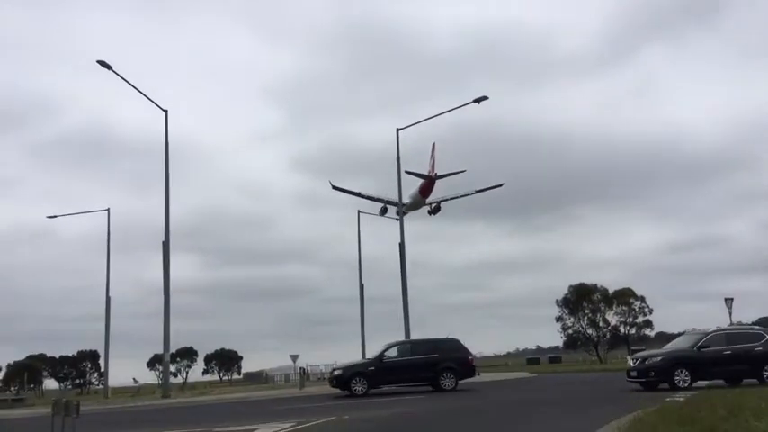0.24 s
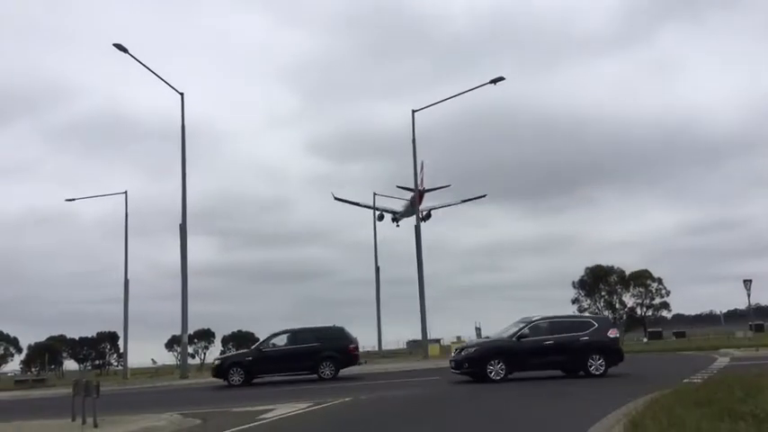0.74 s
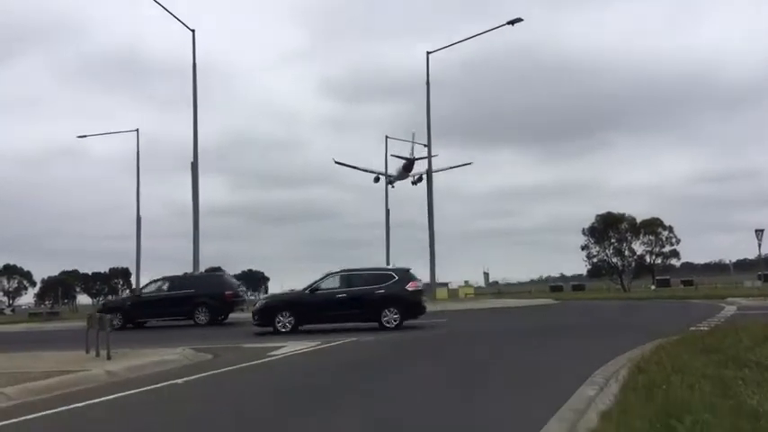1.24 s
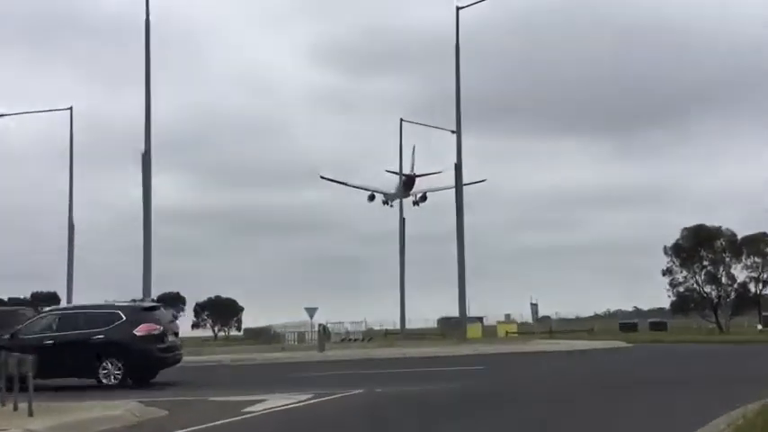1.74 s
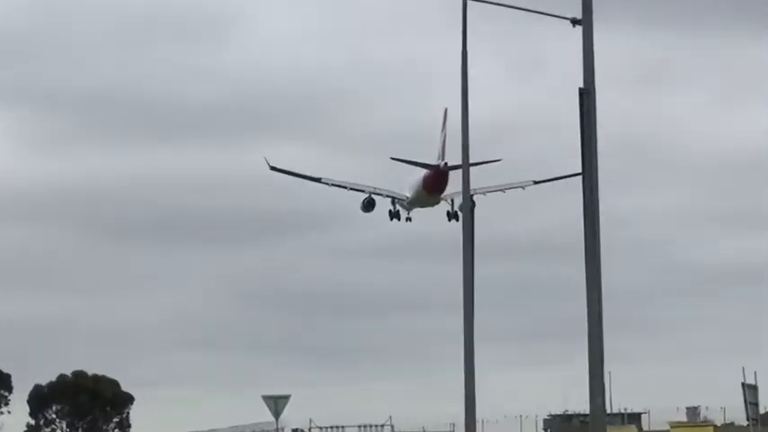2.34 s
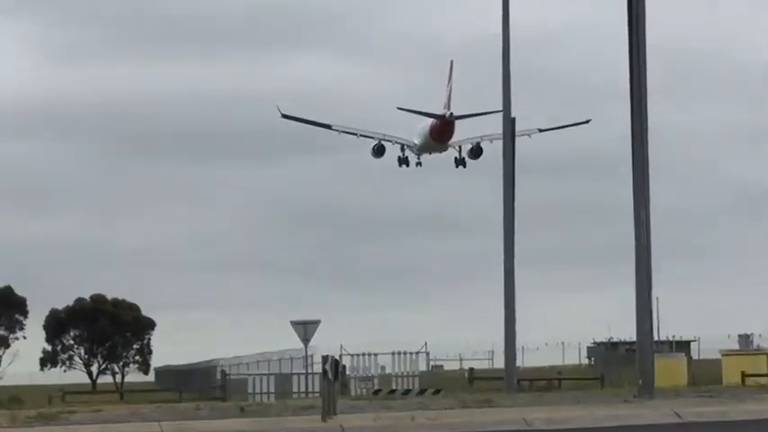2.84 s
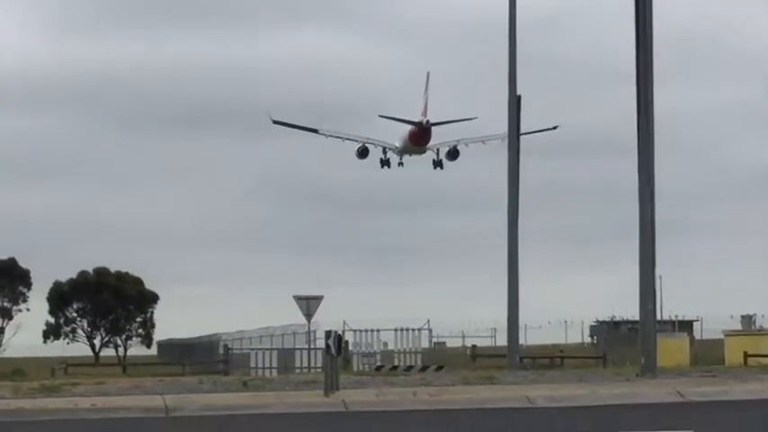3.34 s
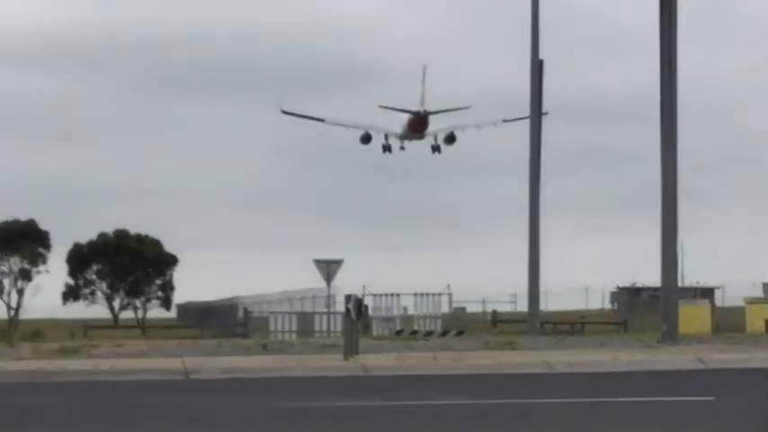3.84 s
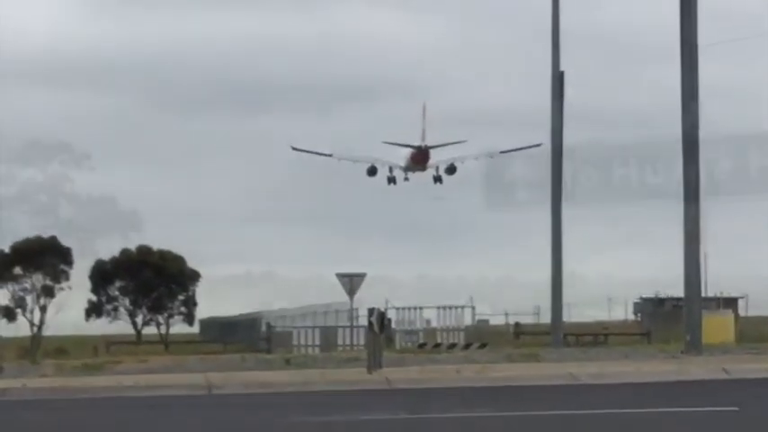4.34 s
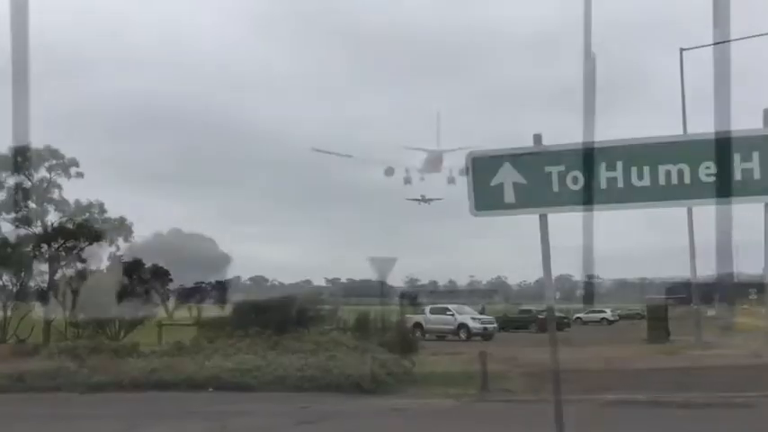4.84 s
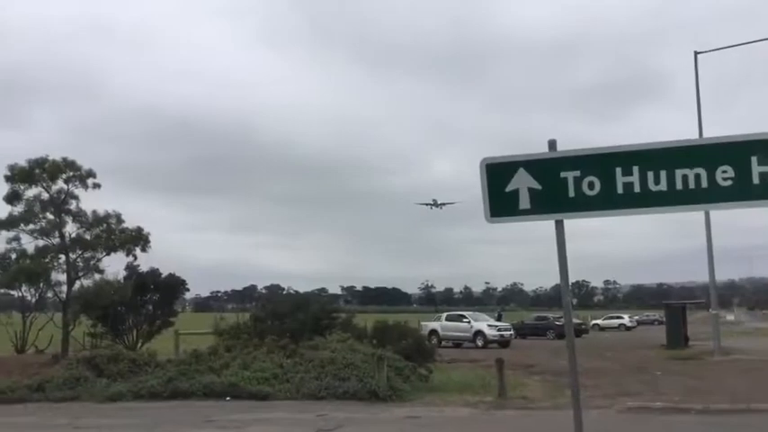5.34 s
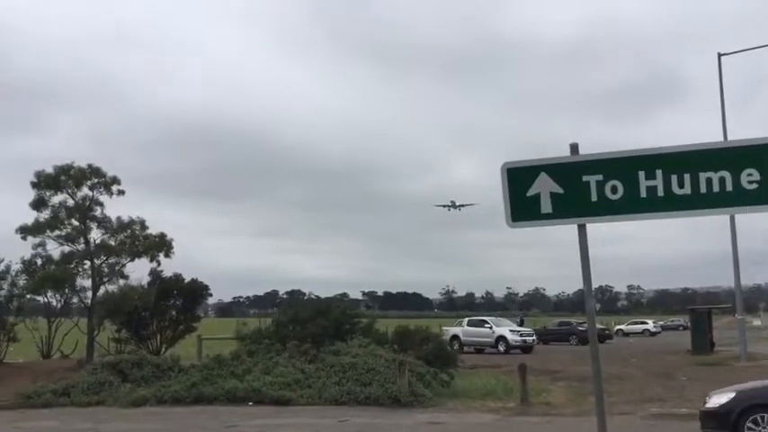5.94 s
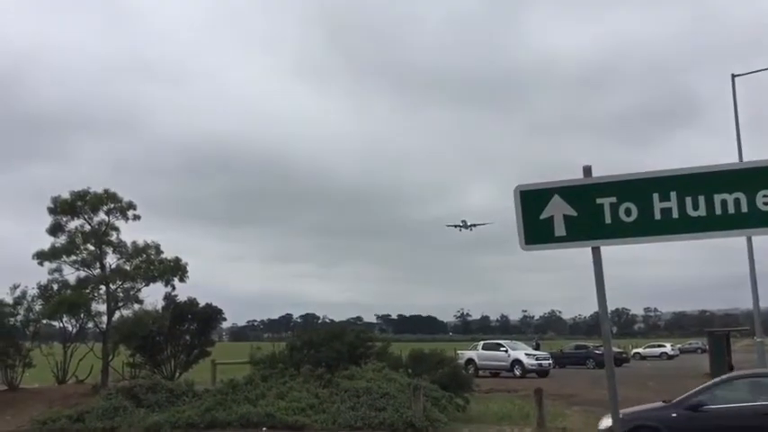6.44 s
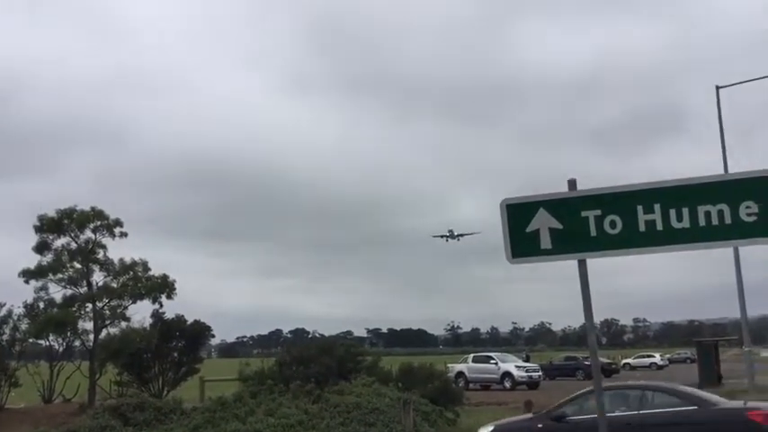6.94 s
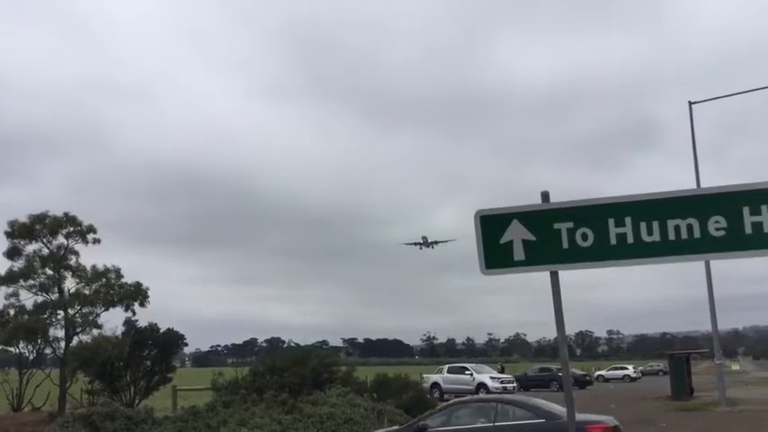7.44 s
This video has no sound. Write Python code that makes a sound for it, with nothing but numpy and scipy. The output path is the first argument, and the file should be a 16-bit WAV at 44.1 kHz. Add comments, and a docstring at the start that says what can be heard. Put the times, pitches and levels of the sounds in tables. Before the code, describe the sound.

Receding landing jet with heavy buffeting rumble, roar and fading hiss dissolves into passing cars: low engine boom, swishing tyres, snapping grit, faint distant aircraft.

```python
"""Under a landing path: a twin-engined airliner, just past low overhead, draws away towards the runway.
Its exhaust noise rumbles, roars against the road's echo and loses hiss to the air; its fans whine and drone.
Then a crossfade to a roadside: a car's firing note booms as it pulls away and thin far whistles waver.
Tyres swish, faint fan notes of a distant airliner drift in, grit snaps and the traffic draws nearest.
A faint hiss of open field lies under both places."""
import sys
import numpy as np
from scipy import signal
from scipy.fft import rfft, irfft, next_fast_len
from scipy.io import wavfile
from scipy.ndimage import uniform_filter1d, map_coordinates

SR = 44100
rng = np.random.default_rng(int(sys.argv[2]) if len(sys.argv) > 2 else 0)


def master(y):
    """Save y as 16-bit WAV."""
    cut = np.clip(np.atleast_2d(y).T, -1, 1)
    pcm = np.round(cut * 32767)  # scale
    wavfile.write(sys.argv[1], SR, pcm.astype(np.int16))


N = 339570

# Spectra give only a shape, since the noise is brought to rms 1. half_s is the time from peak to 1/e.
# Open field, spectrum of its hiss: pitch_hz [Hz], density_db [dB per Hz]
FIELD_SPECTRUM = [(20, -20.5), (3000, 0.5), (8800, 0), (10000, -5.5), (12000, -8), (13300, -14)]
FIELD_DB = -70.5

# Thin far whistles: peak_s [s], level_db [dB], half_s [s], pitch_hz [Hz]
FAR_WHISTLES = [(4.82, -70.5, .1, 5600), (5.04, -65, .05, 5500), (5.22, -71, .13, 5650),
                (5.36, -65, .08, 4580), (5.4, -66, .07, 4980), (5.56, -60, .07, 4950),
                (6.75, -69, .5, 4700), (6.92, -65, .025, 4980)]
# Fan notes of the distant airliner: peak_s [s], level_db [dB], half_s [s], pitch_hz [Hz]
FAR_FAN_NOTES = [(6.004, -44.5, 0.39, 1274), (6.15, -36.5, .45, 999)]

# Low rumble of the road, spectrum: pitch_hz [Hz], density_db [dB per Hz]
TRAFFIC_SPECTRUM = [(16, -48.5), (28, -21.5), (43, -7), (64, 3.5), (123, -2.5), (151, -0.5), (182, -2.5),
                    (221, -2.5), (296, -3.5), (370, -7.5), (430, -11), (520, -15), (680, -31.5),
                    (1140, -120)]
# Tyre noise, spectrum: pitch_hz [Hz], density_db [dB per Hz]
TYRE_SPECTRUM = [(240, -40), (440, -10.5), (620, -2.5), (740, -1), (822, -2), (998, -0.5), (1340, -7.5),
                 (1700, -18), (2210, -49.5), (3740, -120)]
# Brighter tread noise, spectrum: pitch_hz [Hz], density_db [dB per Hz]
TREAD_SPECTRUM = [(790, -29), (1350, -4.5), (1550, 0.5), (1750, 0), (2950, -15), (4250, -25.5), (5040, -47),
                  (5500, -39.5), (7150, -56.5), (12100, -120)]
# Treble fizz of the road, spectrum: pitch_hz [Hz], density_db [dB per Hz]
FIZZ_SPECTRUM = [(2710, -22), (4600, -8.5), (5050, -10), (5230, -11.5), (7180, -20.5), (9330, -31),
                 (15800, -120)]
# Swells of that fizz: peak_s [s], level_db [dB], half_s [s]
FIZZ_RISES = [(5.22, -63.5, 0.57), (7.7, -67.5, .7)]
FIZZ_DB = -65  # its steady part
TRAFFIC_NEAREST_S, TRAFFIC_PASS_S = 7.29, 1.54  # moment of closest distance; time to drive that distance
# Traffic: closest_db [dB], fall_db [dB per tenfold distance]
LOW_LAW, TYRE_LAW, TREAD_LAW = (-23, 11.784), (-27, 14), (-35.5, 14.6)

# Grit snapping under tyres: peak_s [s], tick_db [dB, peak], pitch_hz [Hz], crack_db [dB]
GRIT_SNAPS = [(5.762, -52, 8000, -72), (6.300, -30, 3700, -68), (7.294, -44, 6900, -60),
              (7.2953, -51, 7000, -68), (7.429, -55, 8500, -61)]
GRIT_HALF_S, CRACK_HZ, CRACK_OCTAVES = .0003, 11300, .2  # length of a snap; centre and spread of its crack

# Swish of the nearest tyres, level curve: time_s [s], level_db [dB]
SWISH_LEVEL = [(5.1, -66), (5.35, -42.5), (5.55, -54), (5.8, -71), (6.0, -59), (6.15, -43.5), (6.45, -44.5),
               (6.62, -38.5), (6.83, -40.5), (6.92, -45), (7.3, -53), (7.62, -48)]
# Swish, spectrum: pitch_hz [Hz], density_db [dB per Hz]
SWISH_SHAPE = [(300, -78), (1200, -14.5), (2100, 6), (3000, -5.5), (3800, -14), (4600, -29), (10000, -120)]

# A car's exhaust as it pulls away: mean firing note [Hz], mean level [dB], then the load's course [s]
BOOM_HZ, BOOM_DB = 58.5, -28
BOOM_START_S, BOOM_ATTACK_S, BOOM_HOLD_S, BOOM_RELEASE_S = 4.94, 0.09, 0.52, .27

# The jet's path: moment overhead; time to fly its own height
OVERHEAD_S, HEIGHT_S = -1.0, 0.95
ECHO_MS = 3.806  # lag of the road's echo with the jet overhead
# Treble lost per height of distance; distance (in heights) at which the hiss keeps its spectrum
AIR_DB_PER_KHZ, AIR_NEUTRAL = 1, 2.126
DRONE_HZ, MACH = 372, .135  # drone before its Doppler drop; speed as a fraction of the speed of sound

# Blade whine, mean pitch as heard: time_s [s], pitch_hz [Hz]
WHINE_COURSE = [(.6, 4100), (1.3, 4200), (2.8, 4220), (3.1, 4450), (3.7, 4420), (4.1, 4140), (4.6, 4250)]
# Moments when the whine comes through more clearly: peak_s [s], level_db [dB], half_s [s]
WHINE_RISES = [(2.78, -61, 0.1), (3.5, -64, .35), (4.02, -59, 0.13)]
# Strongest exhaust puffs: peak_s [s], level_db [dB], half_s [s], centre_hz [Hz]
EXHAUST_PUFFS = [(.07, -13.5, 0.031, 297), (.1, -12.5, 0.0575, 90), (.215, -14, 0.056, 310),
                 (.35, -14.5, 0.0635, 85.2), (.558, -10.5, 0.0226, 73), (.64, -17.5, 0.043, 110),
                 (.865, -16.5, 0.028, 151.3), (1.33, -17, 0.042, 141.5), (1.62, -15, 0.02, 90),
                 (1.744, -9, 0.01081, 130.7), (1.79, -12, .016, 80), (2.414, -16.5, 0.029, 109.7),
                 (2.888, -14, .014, 139), (3.11, -15, 0.063, 82), (3.296, -18, .05, 72),
                 (3.48, -9, 0.0072, 130.9), (4.67, -20, 0.0475, 80)]
# Brief swells of noise in the jet's roar and hiss: peak_s [s], level_db [dB], half_s [s], centre_hz [Hz]
ROAR_HISS_SWELLS = [(.49, -48, 0.056, 4810), (.52, -61.5, .08, 6980), (.89, -62, .05, 6500),
                    (.84, -29, 0.15, 1620), (.92, -42, 0.12, 3800), (1.07, -27.5, 0.034, 1195),
                    (1.1, -47.5, 0.11, 4785), (1.4, -57, 0.045, 5300), (1.66, -48.5, 0.055, 3770),
                    (1.95, -29, 0.19, 720), (2.5, -31.5, 0.27, 723), (4.15, -40, 0.18, 1684),
                    (4.2, -28.5, .25, 320)]
PUFF_OCTAVES, SWELL_OCTAVES = 0.43, 0.328  # spread round each centre

# Exhaust rumble at first, spectrum: pitch_hz [Hz], density_db [dB per Hz]
RUMBLE_FIRST = [(18, -45), (30, -22.5), (49, -3.5), (108, 1.5), (167, -2), (199, -1), (240, -4.5),
                (331, -6), (403, -6), (443, -14.5), (480, -18), (620, -42), (1060, -120)]
# Exhaust rumble farther off, spectrum: pitch_hz [Hz], density_db [dB per Hz]
RUMBLE_LATER = [(18, -49), (30, -25), (57, -1.5), (98, 0.5), (260, -3.5), (298, -7), (335, -11),
                (399, -17.5), (480, -21), (620, -47), (1060, -120)]
# Jet roar at first, spectrum: pitch_hz [Hz], density_db [dB per Hz]
ROAR_FIRST = [(210, -26.5), (360, 0), (420, -5.5), (602, 0.5), (902, -6), (1010, -6), (1630, -11),
              (1790, -16), (2110, -13), (2460, -23), (2800, -19), (3640, -49), (6160, -120)]
# Jet roar farther off, spectrum: pitch_hz [Hz], density_db [dB per Hz]
ROAR_LATER = [(210, -29.5), (360, -2.5), (474, -6.5), (563, -1.5), (680, -3.5), (941, -7.5), (1110, -8),
              (1480, -12), (1760, -16), (2110, -18), (2800, -28), (3640, -51.5), (6160, -120)]
# Jet hiss before the air's treble loss, spectrum: pitch_hz [Hz], density_db [dB per Hz]
HISS_SPECTRUM = [(1290, -22.5), (2200, -5), (2500, -4.5), (2710, -6.5), (3350, -5.5), (4170, -9),
                 (4760, -14.5), (5950, -22), (7180, -35), (8600, -41.5), (9800, -53), (15800, -120)]
# High hiss of the jet, round 6 kHz, spectrum: pitch_hz [Hz], density_db [dB per Hz]
HIGH_HISS_SPECTRUM = [(4200, -29.5), (5400, -1.5), (6300, 0), (6900, -3), (7600, -15), (11000, -50)]

# What the jet radiates, one row a layer: overhead_db [dB, without lobe], fall_db [dB per tenfold distance],
# lobe_db [dB], lobe_s [s], lobe_half_s [s]
RUMBLE_RADIATION = (-14.5, 4.5, 0, -0.3, -2.5)
# Roar, same columns: overhead_db [dB], fall_db [dB per tenfold], lobe_db [dB], lobe_s [s], lobe_half_s [s]
ROAR_RADIATION = (-17.5, 13, 2.5, 1, 0.6)
# Hiss, same columns: overhead_db [dB], fall_db [dB per tenfold], lobe_db [dB], lobe_s [s], lobe_half_s [s]
HISS_RADIATION = (-33.5, 12, 4, 1.0, 0.9)
# High hiss, same columns: overhead_db [dB], fall_db [dB per tenfold], lobe_db [dB], lobe_s [s], lobe_half_s [s]
HIGH_HISS_RADIATION = (-54, 22, 4, -0.4, 0)
# Whine, same columns: overhead_db [dB], fall_db [dB per tenfold], lobe_db [dB], lobe_s [s], lobe_half_s [s]
WHINE_RADIATION = (-56.5, 12.5, 6.5, 1.5, 1.3)
# Drone, same columns: overhead_db [dB], fall_db [dB per tenfold], lobe_db [dB], lobe_s [s], lobe_half_s [s]
DRONE_RADIATION = (-29, 12, 7.5, .33, .45)

# Start and end of each place's fade [s]
JET_FADE_S, ROAD_FADE_S = (4.343, 5.17), (4.2, 5.06)
LOW_CUT_HZ, TOP_HZ = 36, 13300  # the microphone chain's band


def amp(db):
    """Decibels to gain."""
    return 10 ** (np.asarray(db) / 20)


def unit(x):
    """x at rms 1."""
    return x / np.sqrt(np.mean(x ** 2) + 1e-20)


def clock():
    """The time of every sample, in seconds."""
    return np.arange(N) / SR


def wobble(rate):
    """A smooth random curve through normal random knots, rate of them a second."""
    coarse = clock()[::16]
    knots = rng.standard_normal(int(N * rate / SR) + 4)
    curve = map_coordinates(knots, [coarse * rate])
    return np.interp(clock(), coarse, curve)


def swell(s, half_s):
    """A smooth rise and fall that peaks at 1."""
    return np.exp(-((clock() - s) / half_s) ** 2)


def swells(rows):
    """The summed gain of several swells."""
    return sum(amp(db) * swell(s, half_s) for s, db, half_s in rows)


def filtered(x, response):
    """x through a gain that depends on frequency."""
    size = next_fast_len(N + SR // 2)
    hz = np.fft.rfftfreq(size, 1 / SR)
    return irfft(rfft(x, size) * response(hz), size)[:N]


def moving_filter(x, gain, size=1024):
    """x through a gain that depends on frequency and time."""
    hz, t, z = signal.stft(x, SR, nperseg=size)
    return signal.istft(z * gain(hz[:, None], t), SR, nperseg=size)[1][:N]


def steady(x, seconds=0.28):
    """x with its slow level held at 1."""
    power = np.abs(uniform_filter1d(x ** 2, int(seconds * SR)))
    return x / np.sqrt(power + 1e-20)


def rush(spectrum, patchy_db):
    """Turbulent noise of rms 1 with a given spectrum and drifting patches of gain."""
    def patches(hz, t):
        field = rng.standard_normal((len(hz), len(t)))
        across_pitch = uniform_filter1d(field, size=7, axis=0)
        return amp(patchy_db * unit(uniform_filter1d(across_pitch, size=12, axis=1)))

    pitch_hz, density_db = np.transpose(spectrum)
    noise = moving_filter(rng.standard_normal(N), patches)
    return unit(filtered(noise, lambda hz: amp(np.interp(np.log(hz + 1), np.log(pitch_hz), density_db))))


def band(centre_hz, octaves):
    """Noise round a centre pitch, its slow level held at 1."""
    def bell(hz):
        return np.exp(-(np.log2((hz + 1) / centre_hz) / octaves) ** 2 / 2)

    return steady(filtered(rng.standard_normal(N), bell), seconds=0.12)


def gusts(rows, octaves):
    """Brief swells of noise, each round its own centre pitch."""
    return sum(amp(db) * swell(s, half_s) * band(centre_hz, octaves) for s, db, half_s, centre_hz in rows)


def cycles(hz):
    """The running phase of a changing pitch, in radians."""
    return 2 * np.pi * np.cumsum(hz) / SR


def tone(hz, width_hz):
    """A tone that turbulent air smears into a narrow band, by random gains on its two quadratures."""
    turn = cycles(hz)
    return unit(wobble(width_hz) * np.cos(turn) + wobble(width_hz) * np.sin(turn))


def blend(near, far, share):
    """From one noise to another at constant power."""
    return np.sqrt(1 - share) * near + np.sqrt(share) * far


def distance(t, closest_s, pass_s):
    """Distance of a source on a straight path, in units of its closest distance."""
    return np.hypot(1, (t - closest_s) / pass_s)


def open_air():
    """The faint even hiss of the open field: shaped noise at a fixed level."""
    return amp(FIELD_DB) * rush(FIELD_SPECTRUM, patchy_db=.5)


def far_whistle():
    """Thin smeared tones that come and go on the wind, wavering in pitch and level."""
    whistles = 0
    for s, db, half_s, hz in FAR_WHISTLES:
        pitch = hz * (1 + .009 * wobble(30))
        whistles = whistles + amp(db + 2.5 * wobble(22)) * swell(s, half_s) * tone(pitch, width_hz=150)
    return whistles


def next_jet():
    """Fan notes of the next airliner, far off: narrow smeared tones that swell faintly through the traffic."""
    notes = 0
    for s, db, half_s, hz in FAR_FAN_NOTES:
        pitch = hz * (1 + 0.00492 * wobble(4))
        notes = notes + amp(db + 1.5 * wobble(6.7)) * swell(s, half_s) * tone(pitch, width_hz=45)
    return notes


def traffic_gain(law):
    """The traffic's level follows its distance from the microphone."""
    closest_db, fall_db = law
    away = distance(clock(), TRAFFIC_NEAREST_S, TRAFFIC_PASS_S)
    return amp(closest_db - fall_db * np.log10(away))


def roadside():
    """Engines rumble under the tyre and tread noise of passing traffic, with a treble fizz on top."""
    low = traffic_gain(LOW_LAW) * steady(rush(TRAFFIC_SPECTRUM, patchy_db=0.5), seconds=0.16)
    tyres = traffic_gain(TYRE_LAW) * steady(rush(TYRE_SPECTRUM, patchy_db=2.0), seconds=0.13)
    tread = traffic_gain(TREAD_LAW) * steady(rush(TREAD_SPECTRUM, patchy_db=0.95))
    fizz = (amp(FIZZ_DB) + swells(FIZZ_RISES)) * steady(rush(FIZZ_SPECTRUM, patchy_db=0.9))
    return low + tyres + tread + fizz


def grit():
    """Small stones snap under a tyre, each a tick of a few cycles with a crisp noise crack on top."""
    crack = band(CRACK_HZ, CRACK_OCTAVES)
    snaps = 0
    for s, tick_db, hz, crack_db in GRIT_SNAPS:
        tick = amp(tick_db) * np.cos(2 * np.pi * hz * (clock() - s))
        snaps = snaps + swell(s, GRIT_HALF_S) * (tick + amp(crack_db) * crack)
    return snaps


def car_swish():
    """Tread noise of the nearest cars, rising and falling unevenly as they roll by."""
    time_s, level_db = np.transpose(SWISH_LEVEL)
    level = amp(np.interp(clock(), time_s, level_db) + 0.64 * wobble(14))
    return level * steady(rush(SWISH_SHAPE, patchy_db=1.5), seconds=0.1)


def car_boom():
    """The wavering firing note of a car under load, with a weaker octave."""
    corners_s = np.cumsum([BOOM_START_S, BOOM_ATTACK_S, BOOM_HOLD_S, BOOM_RELEASE_S])
    load = np.interp(clock(), corners_s, [0, 1, 1, 0])
    turn = cycles(BOOM_HZ * (1 + 0.02208 * wobble(14)))
    note = unit(np.sin(turn) + 0.4 * np.sin(2 * turn))
    return load * amp(BOOM_DB + .8 * wobble(12)) * note


def jet_distance(t):
    """Distance of the jet, in units of its height."""
    return distance(t, OVERHEAD_S, HEIGHT_S)


def jet_gain(law):
    """The jet fades with distance; a lobe of its radiation can lift the level as it sweeps past."""
    overhead_db, fall_db, lobe_db, lobe_s, half_s = law
    fall = fall_db * np.log10(jet_distance(clock()))
    return amp(overhead_db - fall + lobe_db * swell(lobe_s, half_s))


def ground_echo(x):
    """The road returns a copy whose delay shrinks as the jet recedes, so the comb notches sweep upward."""
    delay_ms = ECHO_MS / jet_distance(clock())
    late = np.arange(N) - delay_ms * SR / 1000
    return x + .25 * map_coordinates(x, [late])


def through_air(x):
    """The longer the path to the microphone, the more treble the air absorbs."""
    def absorption(hz, t):
        return amp(-AIR_DB_PER_KHZ * (jet_distance(t) - AIR_NEUTRAL) * hz / 1000)

    return moving_filter(x, absorption)


def jet_fans():
    """A wavering blade whine above the roar, and a drone that Doppler lowers as the jet draws away."""
    t = clock()
    pitch = np.interp(t, *np.transpose(WHINE_COURSE)) * (1 + .012 * wobble(20))
    whine_level = (jet_gain(WHINE_RADIATION) + swells(WHINE_RISES)) * amp(1.7 * wobble(15))
    whine = whine_level * tone(pitch, width_hz=240)
    # share of the jet's speed that points away from the microphone
    receding = (t - OVERHEAD_S) / HEIGHT_S / jet_distance(t)
    turn = cycles(DRONE_HZ / (1 + MACH * receding))
    drone_level = jet_gain(DRONE_RADIATION) * amp(2.2 * wobble(7))
    drone = drone_level * unit(np.sin(turn + .5 * wobble(9)))
    return whine + drone


def jet_puffs():
    """Single large eddies arrive as dull thuds, and roar and hiss swell briefly: short bands of noise."""
    return gusts(EXHAUST_PUFFS, PUFF_OCTAVES) + gusts(ROAR_HISS_SWELLS, SWELL_OCTAVES)


def jet_high_hiss():
    """The high hiss of the jet, a band of noise round 6 kHz that fades with distance."""
    return jet_gain(HIGH_HISS_RADIATION) * steady(rush(HIGH_HISS_SPECTRUM, patchy_db=2.2))


def jet_exhaust():
    """Large eddies rumble, smaller ones roar and hiss; their spectra shift as the jet recedes."""
    t = clock()
    rumble_share = np.interp(t, [.2, 1.3], [0, 1])
    eddies = blend(rush(RUMBLE_FIRST, patchy_db=3.0), rush(RUMBLE_LATER, patchy_db=1.5), rumble_share)
    rumble = jet_gain(RUMBLE_RADIATION) * steady(eddies * amp(0.2 * wobble(22)), seconds=0.21)
    roar_share = np.interp(t, [1.1, 3], [0, 1])
    mixing = blend(rush(ROAR_FIRST, patchy_db=0.37), rush(ROAR_LATER, patchy_db=0.61), roar_share)
    roar = jet_gain(ROAR_RADIATION) * steady(ground_echo(mixing), seconds=0.18)
    dulled = steady(through_air(rush(HISS_SPECTRUM, patchy_db=0.9)), seconds=0.17)
    hiss = jet_gain(HISS_RADIATION) * amp(0.37 * wobble(6.6)) * dulled
    return rumble + roar + hiss


def scene():
    """The landing fades out as the roadside fades in, over a constant open field."""
    road = far_whistle() + next_jet() + roadside() + grit() + car_swish() + car_boom()
    landing = jet_fans() + jet_puffs() + jet_high_hiss() + jet_exhaust()
    fade_out = np.interp(clock(), JET_FADE_S, [1, 0])
    fade_in = np.interp(clock(), ROAD_FADE_S, [0, 1])
    return (fade_out * landing + fade_in * road + open_air())[None]


def record(dry):
    """One microphone, whose chain cuts the deepest rumble and keeps nothing above its band limit."""
    def chain(hz):
        low_cut = hz ** 3 / np.hypot(hz ** 3, LOW_CUT_HZ ** 3)
        return (hz < TOP_HZ) * low_cut

    return filtered(dry[0], chain)[None]


dry = scene()
out = record(dry)
master(out)
```